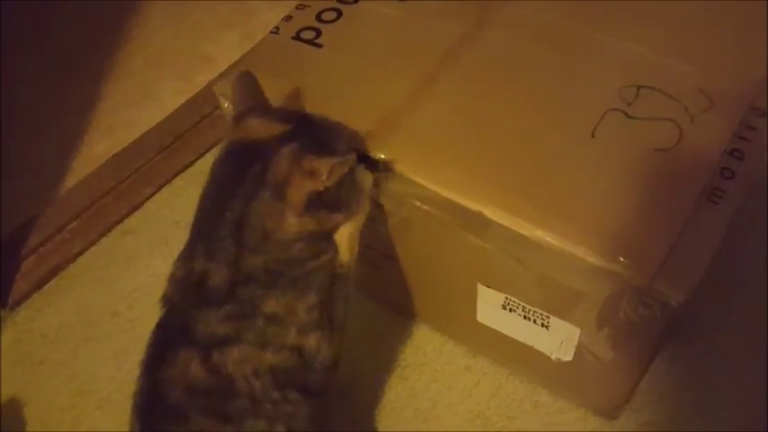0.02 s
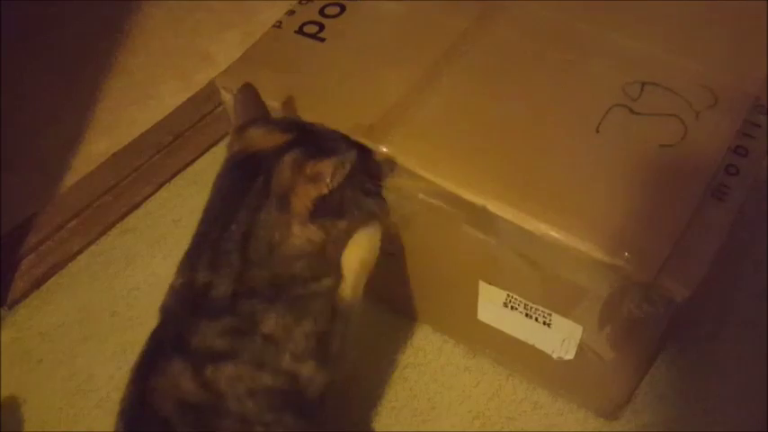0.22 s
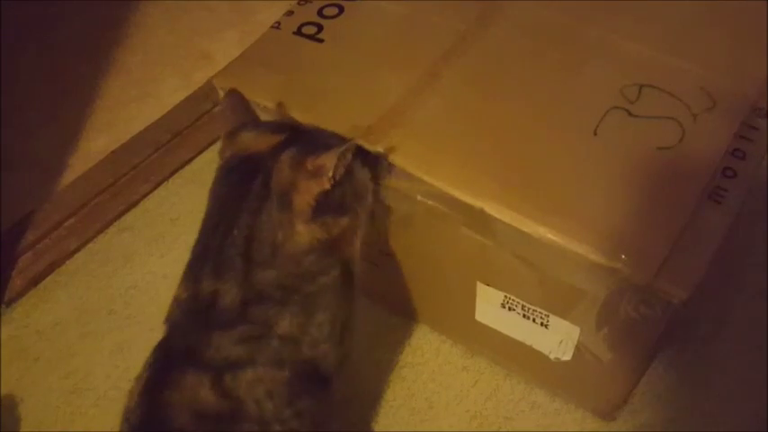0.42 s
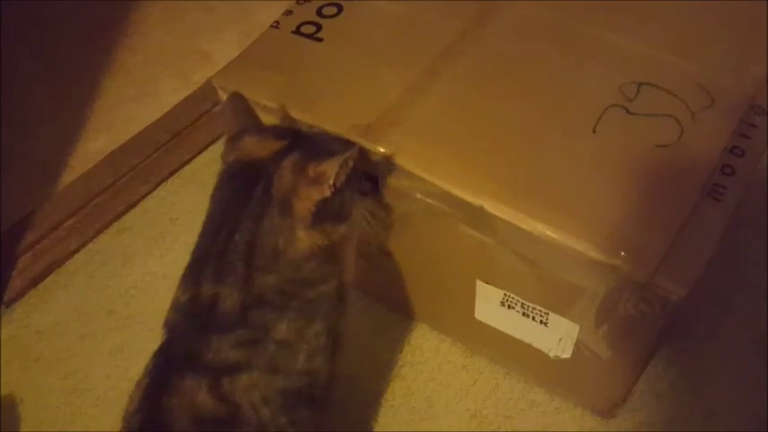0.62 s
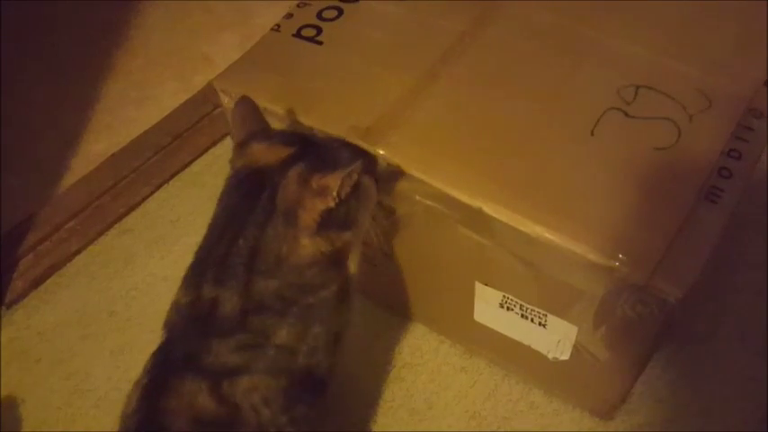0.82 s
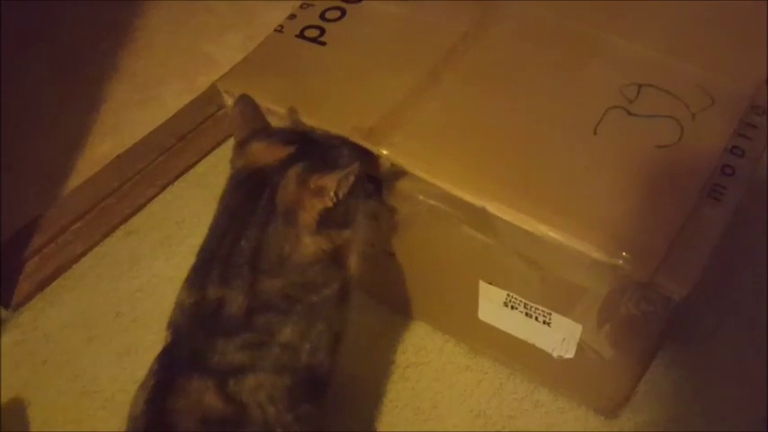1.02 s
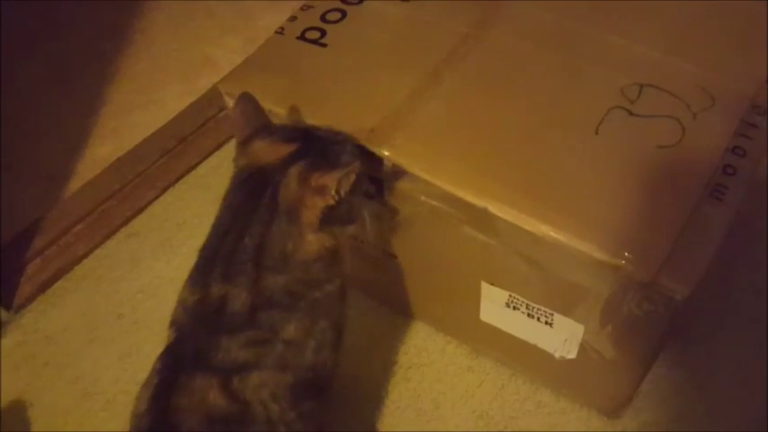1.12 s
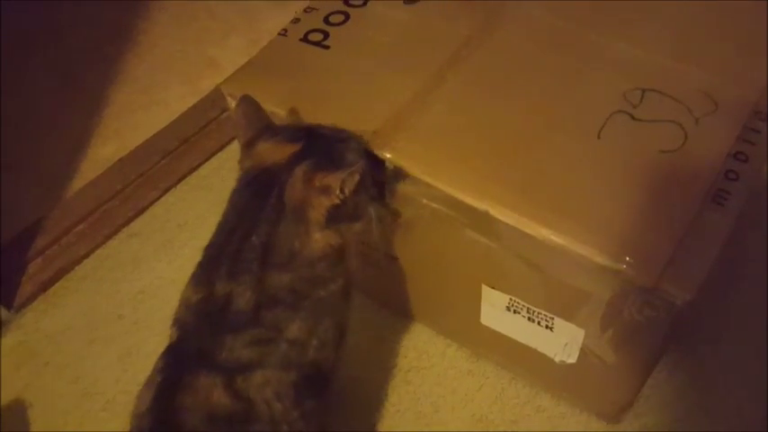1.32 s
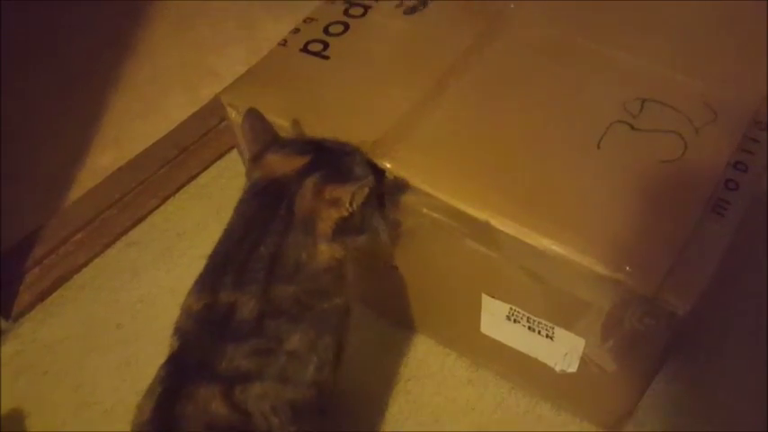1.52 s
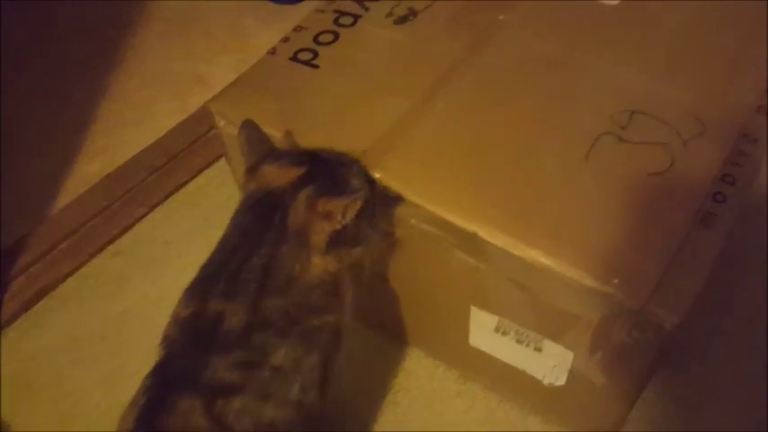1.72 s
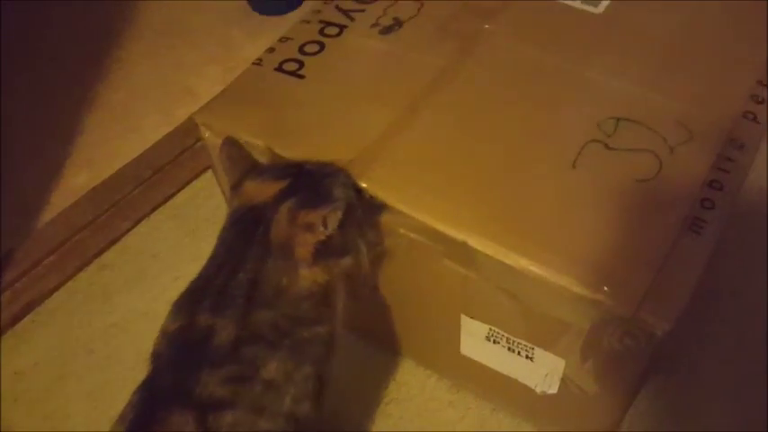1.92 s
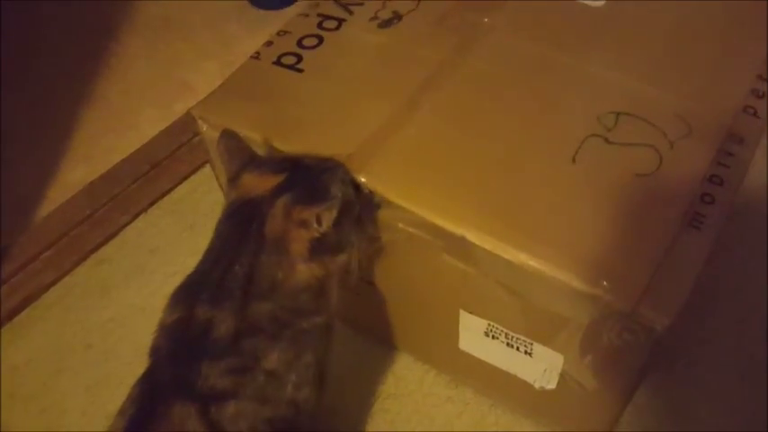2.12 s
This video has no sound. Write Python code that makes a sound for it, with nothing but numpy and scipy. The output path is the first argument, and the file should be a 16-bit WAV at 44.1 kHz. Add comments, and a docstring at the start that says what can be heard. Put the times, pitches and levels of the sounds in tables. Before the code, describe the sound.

A cardboard box edge snaps loudly as it slips from a cat's grip, ringing briefly in a small room. Faint claw scrapes, crisp tape ticks and soft bumps follow, close to the microphone, over a low hum.

```python
"""Faint claw scrapes and soft bumps, then one loud snap: a cat worries the taped edge of a
cardboard box, near the microphone in a small, hard-walled room. The edge slips from its grip,
ringing the panels and the room. More scrapes follow, with a claw flicking free, ticks of tape,
one dry knock from handling the camera and a few dull bumps, all over a low room hum."""
import sys
import numpy as np
from scipy import signal
from scipy.fft import rfft, irfft, next_fast_len
from scipy.io import wavfile
from scipy.ndimage import map_coordinates

SR = 44100
rng = np.random.default_rng(int(sys.argv[2]) if len(sys.argv) > 2 else 0)


def file_out(sig):
    """Save sig as 16-bit WAV at sys.argv[1]."""
    # one column per channel
    cols = np.atleast_2d(sig).T
    # limit, then scale
    lim = np.clip(cols, -1, 1)
    pcm = np.round(lim * 32767).astype(np.int16)
    wavfile.write(sys.argv[1], SR, pcm)


N = 97020

# how alike left and right are for sounds near the microphone: frequency_hz, correlation
NEAR_LIKENESS = [(450, 1), (900, 0.26), (2000, 0.32), (8000, -0.025)]


def snap():
    """The edge lets go in quick slips, each a push with tearing fibres; the hardest rings box and room."""
    # slips of the edge: start_s, level_db
    slips = [(.2044, -17.5), (.2059, -8), (0.2073, 3.5), (0.208, -5), (.2108, -2)]
    # spectrum of the direct snap: frequency_hz, level_db
    colour = [(60, -35), (130, -17), (320, -9), (520, -7), (900, -3.5), (1400, -3.5), (2100, -3),
              (2650, -7), (3100, 0), (3850, -3), (5200, -4.5), (5750, -7), (6300, -1.5), (7800, -12),
              (10200, -15.5), (11800, -12.5), (15500, -26)]
    # the side each band leans to: frequency_hz, left_minus_right_db
    lean = [(130, -1), (300, 1.5), (1400, 4.5), (3100, .5), (6800, -5.5), (12000, -1)]
    fibre_db, fibre_t60_s, right_leads_s = 3, .02, .00005
    pushes = np.zeros((2, N))
    for start_s, level_db in slips:
        push = amp(fibre_db) * burst(fibre_t60_s)
        push[0, round(right_leads_s * SR)] -= 1
        push[1, 0] -= 1
        add(pushes, start_s, amp(level_db) * push)
    left = coloured(pushes[:1], lambda hz: along(colour, hz) + along(lean, hz) / 2)
    right = coloured(pushes[1:], lambda hz: along(colour, hz) - along(lean, hz) / 2)
    hardest_s = max(slips, key=lambda slip: slip[1])[0]
    return amp(2.5) * np.vstack([left, right]) + snap_echoes(hardest_s) + box_panels(hardest_s)


def snap_echoes(start_s):
    """The snap comes back from the nearby walls, then as a diffuse tail."""
    # first reflections: delay_s, level_db, left_minus_right_db
    walls = [(.0080, -10, 1), (.0095, -7.5, -1), (0.0113, -6, -5.5), (0.0138, -4, -3), (.0156, -10, -3)]
    # spectrum of those reflections: frequency_hz, level_db
    wall_colour = [(35, -35.5), (60, -10), (1150, -9.5), (1380, -7), (1630, -4), (2780, -9.5), (3050, -8),
                   (4520, -12.5), (5980, -14), (15500, -27.5)]
    # spectrum of the tail: frequency_hz, level_db
    tail_colour = [(24, -52), (40, -23), (87, -6.5), (166, -11), (197, -3.5), (280, -15), (317, -19.5),
                   (438, -7.5), (562, -14.5), (722, -8), (778, -8.5), (1130, -3.5), (1560, -9.5),
                   (2770, -7), (3840, -11), (6160, -12), (15500, -27)]
    reflections, impulse = np.zeros((2, 2, N))
    for delay_s, level_db, side_db in walls:
        add(reflections, start_s + delay_s, amp(level_db) * pan(side_db) * burst(t60_s=.033))
    add(impulse, start_s, np.ones((2, 1)))
    early = coloured(reflections, lambda hz: along(wall_colour, hz))
    tail = coloured(room(impulse), lambda hz: along(tail_colour, hz))
    return amp(5.5) * early + amp(7) * tail


def box_panels(start_s, swell_s=.0017, drift_rad=.35):
    """A panel springs back with a low thud; resonances of box and room swell and fade."""
    # resonances the snap sets ringing: pitch_hz, level_db, t60_s
    modes = [(88, -45.5, 0.64), (201.8, -37.5, 0.39), (241.5, -38, .35), (286, -31, 0.26),
             (456.3, -32, 0.2), (666, -37.5, .2), (709, -43.5, 0.34), (949, -37, .38), (1137, -36, .4),
             (1185, -38.5, .33), (1735, -34, .16), (2138, -35.5, 0.32), (2775, -40.5, 0.48),
             (3143, -33.5, 0.2)]
    thud_delay_s, thud_hz, thud_db, thud_t60_s = .0064, 139, -18.5, .046
    out, t = np.zeros((2, N)), np.arange(SR) / SR
    thud_envelope = amp(thud_db - 60 * t / thud_t60_s) * (1 - np.exp(-t * thud_hz))
    add(out, start_s + thud_delay_s, thud_envelope * np.sin(2 * np.pi * thud_hz * t))
    for pitch_hz, level_db, t60_s in modes:
        phase_gap = np.arccos(np.clip(along(NEAR_LIKENESS, pitch_hz), -1, 1)) * rng.choice([-1, 1])
        phase = 2 * np.pi * (pitch_hz * t + rng.random()) + drift_rad * wobble(30)[:SR]
        stereo_phase = phase + phase_gap * np.array([[.5], [-.5]])
        envelope = amp(level_db - 60 * t / t60_s) * (1 - np.exp(-t / swell_s))
        add(out, start_s, envelope * np.sin(stereo_phase))
    return out


def claw_scrapes(catches_per_s=9000, catch_spread_db=2.5):
    """A claw drags over the board: dense tiny catches under a rising and falling stroke."""
    # claw strokes: start_s, length_s, level_db, tilt_db_per_octave, rasp_db
    strokes = [(0.033, 0.024, -64, 1, 0.5), (0.123, .02, -55.5, -6, -0.5), (0.153, 0.013, -57.5, 1.5, 0),
               (0.453, .03, -54.5, -2, -2), (0.508, 0.046, -53.5, -2, -7), (.533, .05, -51, 1.5, 5),
               (.583, .027, -55, 1, 3.5), (0.662, 0.067, -68.5, -0.5, -2), (0.72, 0.028, -60, 2, 0.5),
               (0.97, 0.055, -62.5, -3.5, 0), (1.067, .035, -59, -2.5, -4), (1.203, 0.018, -58, 2, -4),
               (1.432, 0.034, -53.5, -1, 1), (1.46, 0.022, -50.5, 2, -1), (1.475, 0.019, -60.5, 0, 0),
               (1.604, 0.019, -64, 1, -1), (1.781, .04, -69.5, 1, -2.5), (2.138, 0.049, -71, 8, -3)]
    # spectrum of scraped cardboard: frequency_hz, level_db
    board_colour = [(90, -20.5), (200, -12), (300, -14), (430, -7), (600, -10), (860, -3), (1300, -8),
                    (2700, -9.5), (5000, -13), (10000, -15.5), (13000, -19), (15500, -21.5)]
    rise_share, fall_share = .34, .22
    rasp_hz, rasp_width_hz = (6400, 10700), 1400  # the claw's own resonances
    rasp = lambda hz: sum(np.exp(-((hz - centre) / rasp_width_hz) ** 2) for centre in rasp_hz)
    out, t = np.zeros((2, N)), np.arange(SR // 4) / SR
    for start_s, length_s, level_db, tilt_db, rasp_db in strokes:
        caught = rng.random(len(t)) < catches_per_s / SR
        catches = caught * amp(catch_spread_db * rng.standard_normal(len(t)))
        grains = unit(spread(catches * rng.standard_normal((2, len(t))), NEAR_LIKENESS))
        progress = t / length_s
        envelope = np.clip(np.minimum(progress / rise_share, (1 - progress) / fall_share), 0, 1)
        colour = lambda hz: along(board_colour, hz) + tilt_db * np.log2(1 + hz / 800) + rasp_db * rasp(hz)
        add(out, start_s, amp(level_db) * coloured(grains * envelope, colour))
    return pan(-.5) * out + amp(-3) * room(out)


def claw_flick():
    """A claw catches twice on the tape and flicks free with a thin, high ring that sounds the room."""
    # two catches and the release: start_s, level_db
    catches = [(0.911, -34), (0.9135, -27), (0.9161, -21.5)]
    # spectrum of the flick: frequency_hz, level_db
    colour = [(300, -22), (1500, -13.5), (3000, -6), (6000, -6.5), (7400, -3.5), (8400, 1), (9300, -8),
              (11000, -13), (15500, -17.5)]
    out, to_room = np.zeros((2, 2, N))
    for start_s, level_db in catches:
        add(out, start_s, amp(level_db) * burst(t60_s=.02))
    release_s, release_db = catches[-1]
    add(to_room, release_s - .009, amp(release_db) * np.ones((2, 1)))  # the tail starts at the release
    return coloured(out + room(to_room), lambda hz: along(colour, hz))


def ticks_and_camera_knock():
    """Short, bright crackles of tape and paper, and one dry, lower knock from handling the camera."""
    # ticks, and the knock at 1.1 s: start_s, level_db, centre_hz, width_octaves, t60_s, room_db
    clicks = [(0.159, -46, 10000, 1.2, 0.026, -7), (0.713, -40, 7000, 1.6, 0.027, -11),
              (1.073, -30, 5930, 2.6, 0.03, -8), (1.1039, -29, 1620, 0.78, 0.0081, -31),
              (1.238, -25.5, 12000, 1.6, 0.021, -7), (2.1545, -35, 11600, 0.8, 0.02, -4)]
    out, to_room = np.zeros((2, 2, N))
    impulse = np.eye(1, SR // 16)
    for start_s, level_db, centre_hz, width_octaves, t60_s, room_db in clicks:
        band = lambda hz: -10 * np.log10(1 + (np.log2((hz + 1) / centre_hz) / width_octaves) ** 4)
        add(out, start_s, amp(level_db) * coloured(burst(t60_s), band))
        add(to_room, start_s, amp(level_db + room_db) * coloured(impulse, band))
    return pan(-3) * out + room(to_room)


def soft_bumps(t60_cycles=5):
    """Soft contacts give one or two dull swings each."""
    # contacts: start_s, level_db, pitch_hz
    bumps = [(.042, -47.5, 109), (0.1271, -41, 450), (0.1398, -35.5, 420), (.160, -39.5, 535),
             (.171, -40, 480), (.187, -45, 420), (1.5393, -40, 310), (1.6071, -43.5, 230),
             (1.671, -47, 275), (1.717, -48.5, 129), (1.7379, -45, 241.4), (1.787, -52, 220),
             (1.844, -57, 119.5)]
    out, t = np.zeros((2, N)), np.arange(SR // 10) / SR
    for start_s, level_db, pitch_hz in bumps:
        cycles = pitch_hz * t
        envelope = amp(level_db - 60 * cycles / t60_cycles) * np.minimum(2 * cycles, 1)
        add(out, start_s, envelope * np.sin(2 * np.pi * cycles))
    return out + amp(-12.5) * room(out)


def room(x, delay_s=.009, build_s=.004):
    """The hard walls' diffuse stereo echo of the left channel of x; treble dies first."""
    # decay of the room: frequency_hz, t60_s
    decay = [(90, .55), (400, .42), (1100, .41), (3000, 0.38), (7000, .3), (14000, .23)]
    # how alike left and right are in the echo: frequency_hz, correlation
    likeness = [(100, 1), (330, -0.78), (640, 0.82), (1300, -0.28), (3000, .03), (10000, -.05)]
    hz, t, spectrum = signal.stft(stereo_noise(SR, likeness), SR, nperseg=256)
    fade = amp(-60 * t / along(decay, hz)[:, None])
    tail = signal.istft(spectrum * fade, SR, nperseg=256)[1]
    tail *= np.clip((np.arange(tail.shape[1]) / SR - delay_s) / build_s, 0, 1)
    response = unit(tail) / np.sqrt(tail.shape[1])
    return pan(-2.94) * signal.fftconvolve(x[:1], response, axes=1)[:, :N]


def room_tone(noise_db=-65, hum_db=-75.5, hum_hz=94.7):
    """Quiet room noise with a wavering low hum."""
    # spectrum of the room noise: frequency_hz, level_db
    colour = [(20, -9.5), (45, -10), (75, -11), (105, -0.5), (150, -9), (210, -8.5), (320, -12.5),
              (410, -8), (650, -13), (1000, -19.5), (2500, -22.5), (6500, -29), (10000, -32), (15500, -31)]
    # how alike left and right are in that noise: frequency_hz, correlation
    likeness = [(60, 0.6), (400, 0.55), (1200, 0.27), (5000, 0.15)]
    noise = unit(coloured(stereo_noise(N, likeness), lambda hz: along(colour, hz)))
    waver = 1 + .6 * wobble(2.8)
    hum = waver * np.sin(2 * np.pi * hum_hz * np.arange(N) / SR + wobble(3))
    return amp(noise_db) * noise + amp(hum_db) * hum


def amp(db):
    """Decibels to gain."""
    return 10 ** (np.asarray(db) / 20)


def unit(x):
    """x at rms 1."""
    return x / np.sqrt(np.mean(x ** 2) + 1e-20)


def along(points, hz):
    """Read (frequency_hz, value) points at hz, on a log frequency axis."""
    points_hz, values = np.transpose(points)
    return np.interp(np.log(hz + 1), np.log(points_hz + 1), values)


def pan(left_minus_right_db):
    """Left and right gains."""
    return amp(left_minus_right_db * np.array([[.5], [-.5]]))


def add(out, start_s, x):
    """Mix x into out from start_s."""
    i = max(round(start_s * SR), 0)
    out[:, i:i + x.shape[-1]] += x[..., :N - i]


def coloured(x, curve, size=8192):
    """x through a minimum-phase filter of unit energy; curve gives its shape in dB for Hz."""
    cepstrum = irfft(np.log(amp(curve(np.fft.rfftfreq(size, 1 / SR))) + 1e-6))
    cepstrum[1:size // 2] *= 2
    cepstrum[size // 2 + 1:] = 0
    response = irfft(np.exp(rfft(cepstrum)))
    return signal.fftconvolve(x, response[None] / np.linalg.norm(response), axes=1)[:, :x.shape[1]]


def spread(x, likeness):
    """Two unrelated signals as a stereo pair whose likeness depends on frequency."""
    size = x.shape[1]
    angle = np.arccos(np.clip(along(likeness, np.fft.rfftfreq(size, 1 / SR)), -1, 1)) / 2
    mid, side = irfft(rfft(x) * [np.cos(angle), np.sin(angle)], size)
    return np.array([mid + side, mid - side])


def stereo_noise(size, likeness):
    """White noise with the given left-right likeness."""
    return spread(rng.standard_normal((2, size)), likeness)


def burst(t60_s):
    """A dying burst of stereo noise, of unit energy per channel."""
    t = np.arange(SR // 16) / SR
    return unit(stereo_noise(len(t), NEAR_LIKENESS) * amp(-60 * t / t60_s)) / np.sqrt(len(t))


def wobble(knots_per_s):
    """A smooth random curve."""
    return map_coordinates(rng.standard_normal(512), [np.arange(N) * knots_per_s / SR], mode="mirror")


def scene():
    """Everything that reaches the microphone."""
    return snap() + claw_scrapes() + claw_flick() + ticks_and_camera_knock() + soft_bumps() + room_tone()


def record(dry):
    """The camera rounds off the highest peaks and keeps nothing above its band limit."""
    ceiling, top_hz, rolloff_hz = .85, 16000, 450
    rounded = dry / (1 + np.abs(dry / ceiling) ** 4) ** (1 / 4)
    size = next_fast_len(N + SR // 2)
    hz = np.fft.rfftfreq(size, 1 / SR)
    passband = np.sin(np.pi / 2 * np.clip((top_hz - hz) / rolloff_hz, 0, 1)) ** 2
    return irfft(rfft(rounded, size) * passband, size)[:, :N]


dry = scene()
out = record(dry)
file_out(out)
```